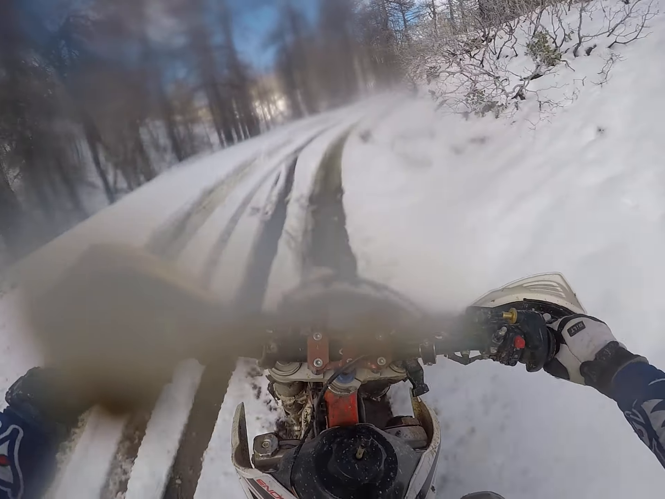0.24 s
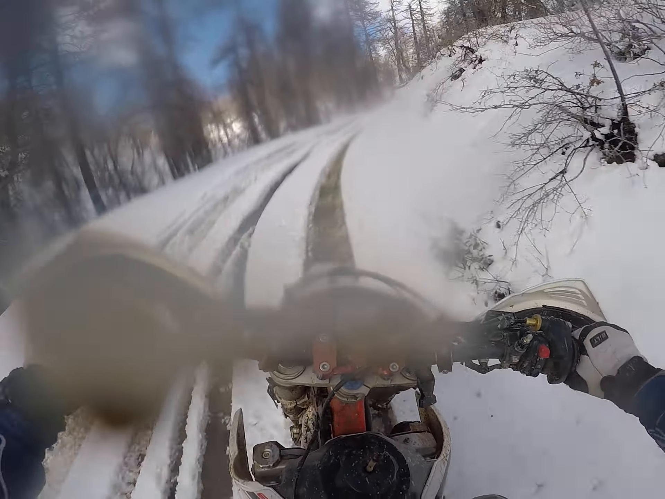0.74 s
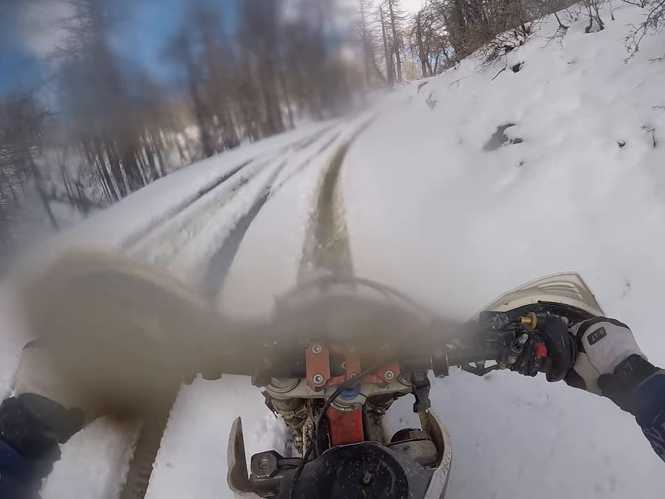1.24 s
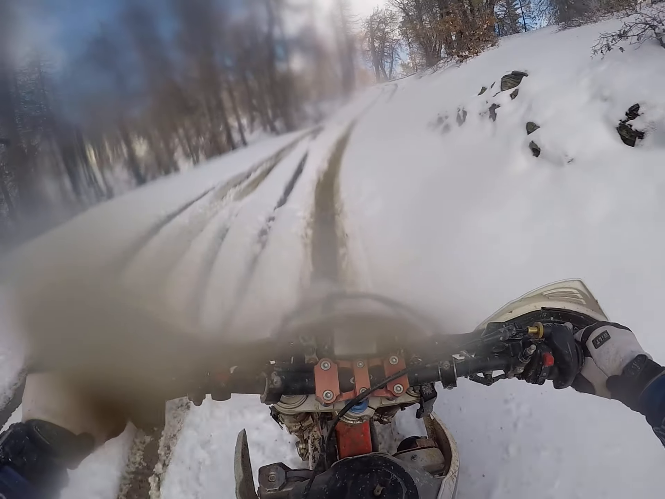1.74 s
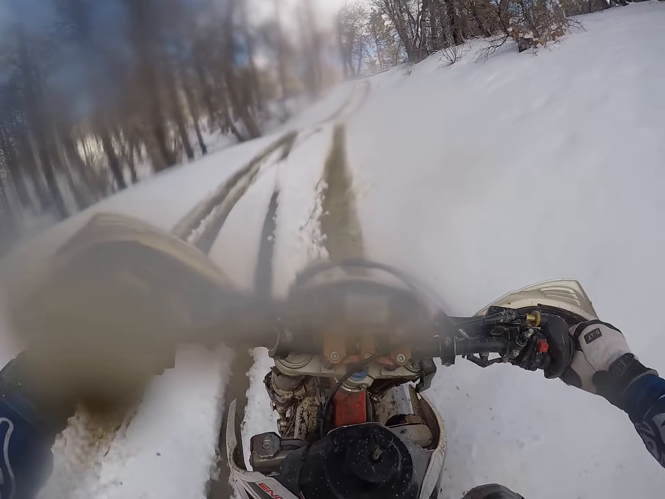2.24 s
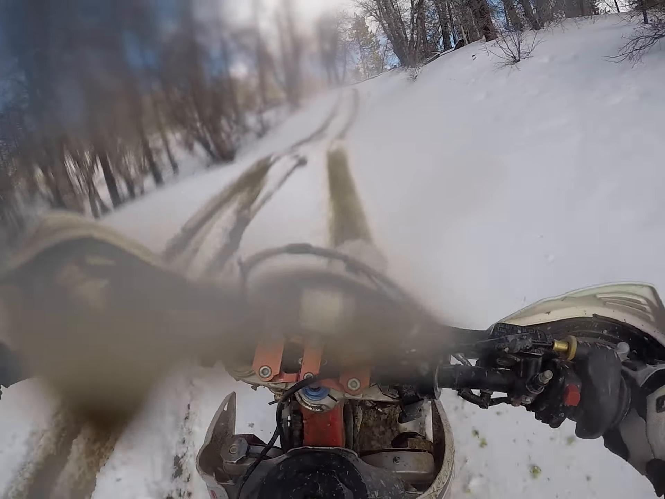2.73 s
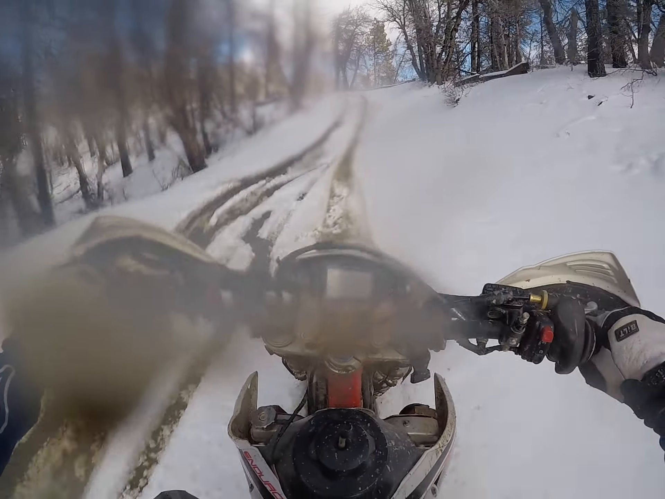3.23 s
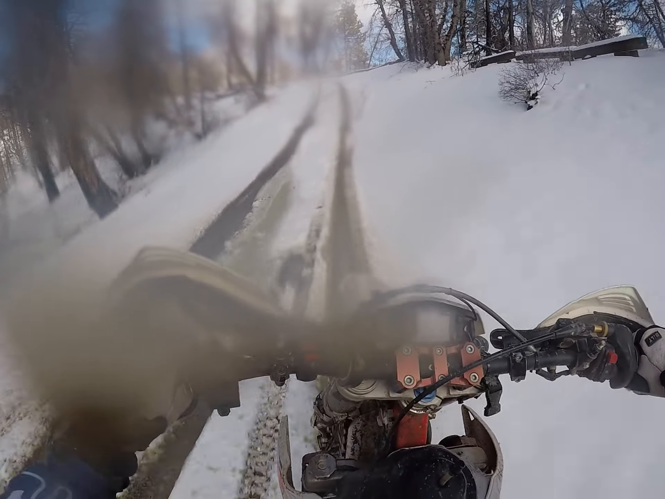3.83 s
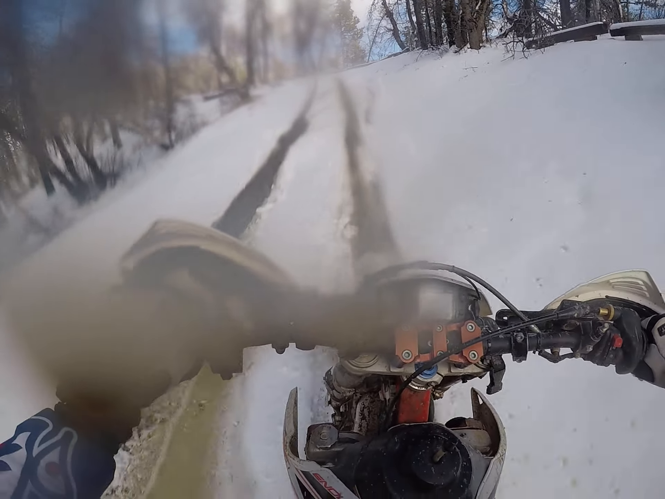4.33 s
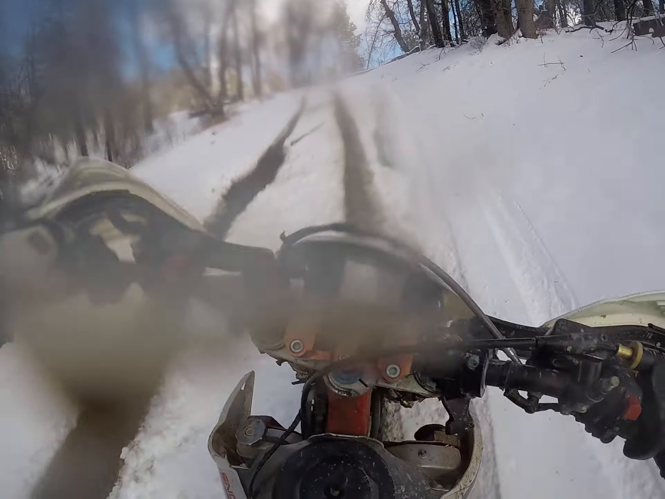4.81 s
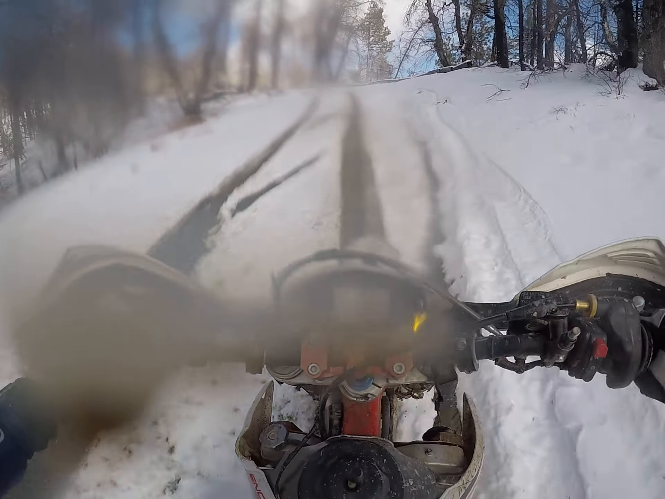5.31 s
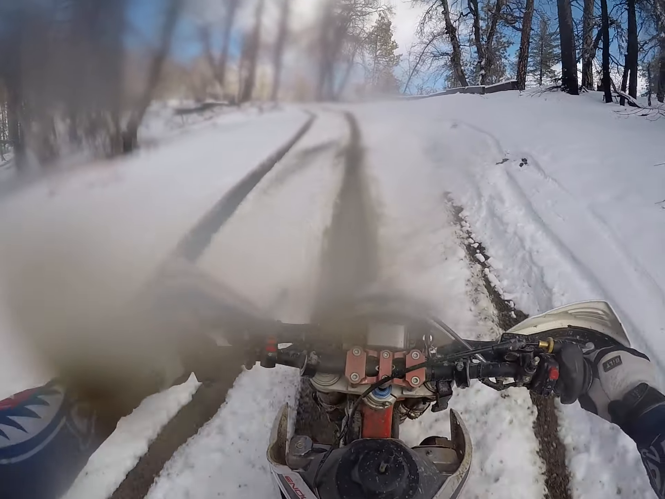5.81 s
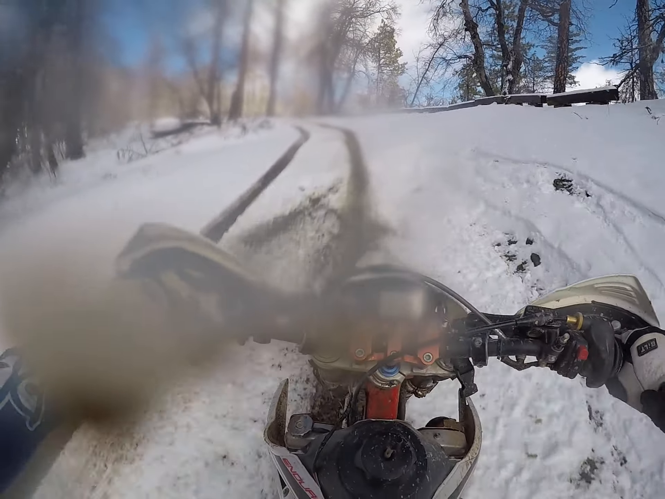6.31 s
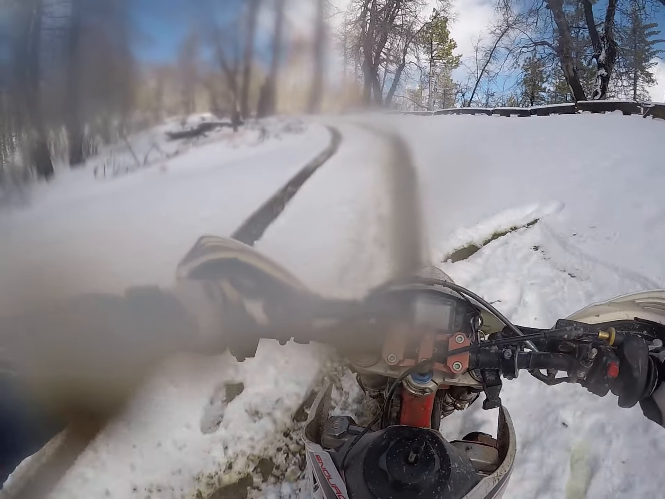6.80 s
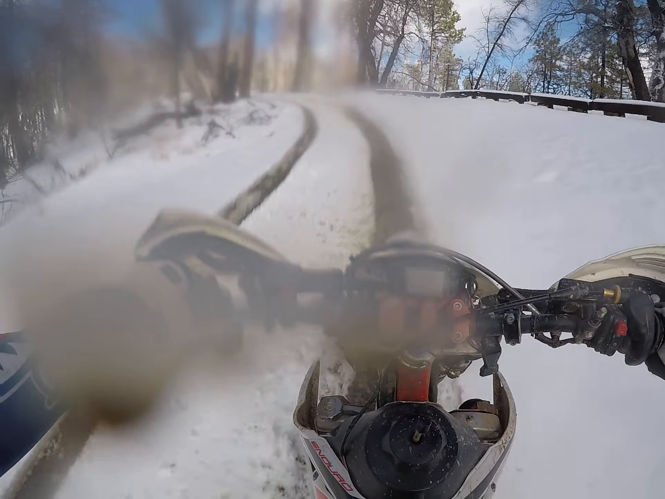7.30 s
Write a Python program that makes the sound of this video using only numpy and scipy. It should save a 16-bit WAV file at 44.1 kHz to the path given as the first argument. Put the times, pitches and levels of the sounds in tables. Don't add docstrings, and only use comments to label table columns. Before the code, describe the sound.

Heard from the rider's helmet on a snowy trail, a four-stroke dirt bike chugs with a low, pulsing exhaust and busy metallic clatter. The pitch wobbles with small wheel slips, then flares clearly before the third second and again before the fifth. Loose parts buzz around four seconds, a brake disc rings faintly, and wind rumbles softly at the microphone.

```python
import sys
import numpy as np
from scipy import signal
from scipy.io import wavfile

SR = 44100
rng = np.random.default_rng(int(sys.argv[2]) if len(sys.argv) > 2 else 0)


def level_to_linear(level):
    exponent = np.asarray(level, float) / 20
    return 10 ** exponent


def master_out(mix):
    frames = np.transpose(np.atleast_2d(mix))
    ceiling = np.clip(frames, -1, 1)
    pcm = np.round(ceiling * 32767).astype(np.int16)
    wavfile.write(sys.argv[1], SR, pcm)


N = 332955

# time [s], firing rate [firings per s].
CRUISE_SPEED = [(0.0, 35.87), (0.53, 35.48), (0.82, 33.59), (2.3, 33.77), (2.45, 34.39), (3.07, 34.74),
                (3.57, 33.86), (3.87, 33.95), (4.4, 35.74), (4.63, 36.11), (5.15, 36.57), (5.84, 35.83),
                (6.06, 37.35), (6.16, 38.29), (6.54, 38.98), (6.81, 39.04), (7.08, 35.57), (7.55, 36.73)]


def rms_one(x):
    return x / np.sqrt(np.mean(x ** 2) + 1e-20)


def at_hz(points, hz):
    table_hz, values = np.array(points)[:, 0], np.array(points)[:, 1]
    return np.interp(np.log(hz), np.log(table_hz), values)


def along(rows):
    s, *columns = np.transpose(rows)
    return [np.interp(np.arange(N) / SR, s, c) for c in columns]


def spells(rows, edge_s):
    t = np.arange(N) / SR
    total = 0
    for start, length, *values in rows:
        inside = np.minimum(t - start, start + length - t)
        total = total + np.outer(values, np.clip(inside / edge_s + 0.5, 0, 1))
    return total


def drift(rate):
    r = np.exp(-80 * np.pi * rate / SR)
    slow = signal.lfilter([1], [1, -2 * r, r * r], rng.standard_normal(N // 40 + 2002))
    slow = slow[2000:]
    return np.interp(np.arange(N) / 40, np.arange(len(slow)), rms_one(slow))


def resonate(x, hz, width_hz):
    r = np.exp(-np.pi * width_hz / SR)
    zeros = (1 - r * r) / 2 * np.array([1, 0, -1])
    poles = [1, -2 * r * np.cos(2 * np.pi * hz / SR), r * r]
    return signal.lfilter(zeros, poles, x)


def pan(db):
    return level_to_linear(np.array([[db / 2], [-db / 2]]))


def heard(x, side_db, lag_s):
    left, right = x * pan(side_db)
    return np.array([np.roll(left, round(lag_s * SR)), right])


def body(x, modes, patchy_db=0):
    out = 0
    for k, (hz, width_hz, db, side_db, lag_s) in enumerate(modes):
        gain = (-1) ** k * level_to_linear(db + patchy_db * drift(2.14))
        out = out + gain * heard(rms_one(resonate(x, hz, width_hz)), side_db, lag_s)
    return out / np.std(out.mean(axis=0))


def bank(spectrum, low_hz, count, alike, patchy_db):
    # frequency [Hz], left-right difference [dB].
    side_balance = [(60, 0.5), (110, 11), (200, 23), (370, 18), (680, -1), (1250, -7), (2280, -6),
                    (4190, 3), (7690, 0.5), (14100, -27.5)]
    out, edges = 0, low_hz * 2 ** (np.arange(count + 1) / 2)
    white = rng.standard_normal((2, 2, N))
    for k, (a, b) in enumerate(zip(edges, edges[1:])):
        band = signal.butter(2, [a, b], "band", fs=SR, output="sos")
        mid, side = signal.sosfilt(band, white[k % 2])
        hz = np.sqrt(a * b)
        likeness = np.clip(at_hz(alike, hz), -1, 1)
        gain = level_to_linear(at_hz(spectrum, hz) + patchy_db * drift(6.0)) * pan(at_hz(side_balance, hz))
        out = out + gain * (np.sqrt(1 + likeness) * mid + np.sqrt(1 - likeness) * side * [[1], [-1]])
    return out / np.std(out.mean(axis=0))


def gate(cycle, centre, sharp):
    return rms_one(np.exp(sharp * np.cos(2 * np.pi * (cycle - centre))))


def wind():
    # frequency [Hz], density [dB per Hz].
    rumble = [(15, -3), (30, 0), (80, -5), (150, -4), (250, -14), (700, -26), (1400, -34)]
    # start [s], length [s], rise [dB].
    gusts = [
        (.45, 0.39, 7.5),
        (1.2, 0.15, 7),
        (1.8, 0.15, 9),
        (3.45, 0.66, 3),
        (4.35, .15, 3.5),
        (5.8, 0.22, 3),
        (6.95, 0.22, 6.5),
    ]
    level_db = -28 + spells(gusts, edge_s=0.044)[0] + 1.8 * drift(8.7)
    return level_to_linear(level_db) * bank(rumble, 19.4, count=10, alike=[(20, 0.092), (1000, 0.35)], patchy_db=1.0)


def disc():
    # frequency [Hz], level [dB], time to decay by about 145 dB [s].
    disc_modes = [(8260, -2, .25), (10780, -9, .3), (12960, -19, .2), (13220, -19, .2), (14670, 6, .15)]
    # start [s], length [s], friction level [dB].
    rubs = [
        (0.32, 0.022, -55),
        (0.48, 0.047, -60),
        (1.56, 0.12, -59),
        (2.174, 0.043, -64),
        (2.833, 0.099, -59),
        (3.641, 0.14, -52.5),
        (3.847, 0.056, -62),
        (4.652, 0.077, -55),
    ]
    t = np.arange(N) / SR
    touch = level_to_linear(-71.5)
    for start, length, db in rubs:
        touch = touch + level_to_linear(db) * ((t > start) & (t < start + length))
    friction = touch * rng.standard_normal(N)
    ring = 0
    for hz, db, t60 in disc_modes:
        ring = ring + level_to_linear(db) * np.sqrt(SR * t60) / 2 * resonate(friction, hz, 5.3 / t60)
    return ring * pan(0.52)


def mechanical_hiss():
    # frequency [Hz], density [dB per Hz].
    hiss_colour = [(760, -30), (1300, 0), (1450, -5), (1760, -1.5), (2690, -4), (2910, -3.5), (3290, -3.5),
                   (3530, -9.5), (5130, -5.5), (6670, -3.5), (10500, -31.5), (14100, -37), (14500, -51)]
    # frequency [Hz], left-right likeness [-1 to 1].
    likeness = [(1300, 0.69), (2500, 0.56), (4500, 1), (6500, -0.38), (9000, -0.39), (14000, 1)]
    hiss = bank(hiss_colour, 1280, count=7, alike=likeness, patchy_db=1.58)
    return signal.sosfilt(signal.cheby2(8, 30, 13300, fs=SR, output="sos"), hiss)


def side_cover(ticks):
    # start [s], length [s], rise over rest [dB].
    cover_spells = [(0, .9, 4.5), (.9, 0.95, 7), (1.95, .25, 11), (2.3, 0.63, 7), (3.2, .78, 6.5),
                    (4.2, 0.14, 12), (4.32, 0.17, 14.5), (4.58, .12, 12), (4.82, .08, 14),
                    (6.6, 0.32, -2.5), (7.2, .35, 8)]
    rest_db = -47
    cover_db = rest_db + spells(cover_spells, edge_s=0.051)[0]
    ring = heard(rms_one(resonate(ticks, 2891, 52)), -2, 0)
    return level_to_linear(cover_db + 31.5 + 0.51 * drift(13)) * ring


def loose_guard(ticks, cycle):
    # frequency [Hz], width [Hz], level [dB], left-right [dB], left lag [s].
    guard_modes = [(2260, 57, -1.5, -2.1, 0), (3530, 76, -1, -5, 0.0026), (4110, 80, -5, -3, 0.003)]
    # start [s], length [s], rise over rest [dB].
    rattles = [
        (3.75, 0.28, 12.5),
        (4.2, 0.43, 11.5),
    ]
    rest_db = -19.5
    level = level_to_linear(rest_db + spells(rattles, edge_s=0.07)[0])
    return level * gate(cycle, 0.2, 0.51) * body(ticks, guard_modes, patchy_db=4.0)


def clatter(cycle):
    # frequency [Hz], width [Hz], level [dB], left-right [dB], left lag [s].
    case_modes = [(1730, 184, 5, -9, 0.00066), (2337, 114, 1.5, -0.5, 0), (2940, 73, -1, -6.5, 0.0045),
                  (3554, 80, -3, -13.5, 0), (3990, 160, -3, -4, 0), (4462, 100, 0, -3, 0),
                  (6630, 110, -18.5, 33, 0.027)]
    swell = gate(cycle, 0.2, 0.17) * level_to_linear(0.65 * drift(16))
    born = rng.random(N) < 1200 * swell / SR
    strength = level_to_linear(3.1 * np.minimum(rng.exponential(1, N), 4))
    ticks = born * rng.choice([-1, 1], N) * strength + 1e-18
    cases = level_to_linear(-2) * body(ticks, case_modes, patchy_db=2.7)
    return swell * mechanical_hiss() + cases + side_cover(ticks) + loose_guard(ticks, cycle)


def intake(pulses, cycle, rough):
    # frequency [Hz], width [Hz], level [dB], left-right [dB], left lag [s].
    box_modes = [(609, 177, -12.5, -10.5, .0003), (773, 83, -12, -9, .0002), (985, 156, -5, -9, .0001),
                 (1183, 218, -5.5, -10, .0001)]
    noise = rng.standard_normal(N) + 0.7 * rng.standard_normal((2, N))
    drive = rms_one(pulses) + rough * gate(cycle, 0.15, 0.22) * noise
    return body(drive, box_modes, patchy_db=0.95)


def snorkel(pulses, rough):
    # frequency [Hz], width [Hz], level [dB], left-right [dB], left lag [s].
    tube_mode = (487, 64, 0, -3.5, 0.47)
    drive = rms_one(pulses) + rough * rng.standard_normal(N)
    return body(resonate(drive, 417, 149), [tube_mode])


def crank(cycle):
    # multiple of the firing rate, level [dB], left-right [dB], left lag [rad].
    orders = [(1, -3, 5.5, .9), (2, .7, 6, .6), (3, -10, 5, .4), (4, -12, 4.5, .4), (5, -13, 4, .4)]
    sway = (1 + 0.33 * drift(1.6)) * np.array([[-0.5], [0.5]])
    out = 0
    for k, db, side_db, lag in orders:
        gain = np.sqrt(2) * level_to_linear(db + 1.3 * drift(4.1)) * pan(side_db)
        out = out + gain * np.sin(2 * np.pi * k * cycle + k * k + lag * sway)
    return out


def speed():
    # peak time [s], extra rate [firings per s], rise [s], fall [s].
    slips = [(0.23, 1.703, 0.11, 0.12), (0.42, 1.787, 0.16, 0.11), (0.71, 0.738, 0.18, 0.11),
             (0.95, 1.431, 0.12, 0.4), (1.34, 1.854, 0.17, 0.22), (1.88, 0.768, 0.08, 0.5),
             (2.71, 9.699, 0.24, 0.27), (2.86, 2.974, 0.13, 0.07), (3.17, 1.679, 0.1, 0.13),
             (3.47, 2.387, 0.3, 0.1), (4.27, 2.384, 0.17, 0.11), (4.52, 0.303, 0.1, 0.07),
             (4.76, 6.345, 0.12, 0.45), (4.765, 2.033, 0.08, 0.1), (5.28, 2.005, 0.12, 0.12),
             (5.51, 0.914, 0.1, 0.1), (5.96, 2.198, 0.12, 0.1), (6.62, 1.051, 0.08, 0.19),
             (7.39, 2.81, 0.26, 0.16)]
    t = np.arange(N) / SR
    rate = along(CRUISE_SPEED)[0]
    for peak, extra, rise, fall in slips:
        rate = rate + np.interp(t, [peak - rise, peak, peak + fall], [0, extra, 0])
    return rate


def firings(cycle, jitter_s):
    # delay [s], signed strength, scatter [dB].
    blows = [
        (0, .5, 1.2),
        (.0058, -.9, .5),
        (.0094, -.55, .8),
        (.0148, -.2, 2.0),
    ]
    at, out = np.flatnonzero(np.diff(np.floor(cycle))), np.zeros(N)
    chance = rng.standard_normal((len(at), 2 * len(blows)))
    for k, (delay, strength, scatter_db) in enumerate(blows):
        when = at + ((delay + jitter_s * chance[:, 2 * k]) * SR).astype(int)
        np.add.at(out, np.clip(when, 0, N - 1), strength * level_to_linear(scatter_db * chance[:, 2 * k + 1]))
    return out


def exhaust(pulses, cycle, load, rough):
    # frequency [Hz], width [Hz], level [dB], left-right [dB], left lag [s].
    silencer = [(194.6, 69, -4.5, 5, 0.0002), (278.8, 112, 0.5, 4, 0.00035),
                (355.6, 82, -5.5, 6.5, 0.00041)]
    long_ring = [(245.3, 28, -1, 2.8, 0.00049), (307, 57, -9, 3.7, 0.00027)]
    hollow = [(190, 35, 0, 2.8, 0.00017), (331, 67, 4.5, 1.5, 0.00033), (420, 23, -4, 2, 0.00019)]
    drive = rms_one(pulses) + rough * gate(cycle, 0.15, 0.16) * rng.standard_normal(N)
    drive = -resonate(drive, 184, 490)
    pull, overrun = np.clip(load, 0, 1), np.clip(-load, 0, 1)
    plain = np.sqrt(1 - pull - overrun) * body(drive, silencer, patchy_db=1.65)
    pulling = np.sqrt(pull) * body(resonate(drive, 251.0, 78), long_ring)
    return plain + pulling + np.sqrt(overrun) * body(drive, hollow)


def scene():
    # time [s], exhaust level [dB].
    effort = [(0, -15), (.3, -15), (.58, -16.5), (.86, -15), (1.05, -16.5), (1.25, -14), (1.75, -17.5),
              (2.08, -15), (2.5, -13.5), (3.0, -15.5), (3.6, -16), (3.91, -18.5), (4.2, -14), (4.5, -16),
              (5.05, -16), (5.45, -14.5), (6.8, -14.5), (7.55, -14)]
    # start [s], length [s], load change [negative shuts, positive opens; the sum is
    # kept within -1 to 1], exhaust rise [dB].
    twists = [(.5, 0.055, 0.25, -6.5), (2.2, 0.054, -0.91, -1.5), (2.605, 0.07, 1, 3),
              (2.7, 0.12, -1.3, 1.5), (2.85, 0.089, -0.28, -5), (3.08, 0.23, 0.53, 2),
              (3.32, 0.036, -0.45, -7), (4.58, 0.058, 0.043, 3.5), (4.652, .1, 1.1, 7.5),
              (4.755, .09, -.9, -2.5), (4.845, 0.14, -0.67, -1.3), (5.65, 0.2, 0.055, -2),
              (6.05, 0.16, 0.46, 1.5), (6.88, .17, -0.34, -1), (7.13, 0.18, 0.11, 2)]
    # start [s], length [s], tube rise [dB].
    leans = [
        (.55, .35, 0.5),
        (1.8, 0.97, -2),
        (2.67, 0.42, 4.5),
        (3.2, 0.63, 4),
        (4.38, 0.21, 5),
        (4.62, .5, -4.5),
    ]
    rate = speed()
    effort_db = along(effort)[0]
    twist, twist_db = spells(twists, edge_s=0.017)
    silencer_db = effort_db + twist_db
    over_mean_db = -15.5
    load = np.clip(0.051 + 0.3 * (effort_db - over_mean_db) + twist, -1, 1)
    faster = along(CRUISE_SPEED)[0] - 36

    duck_db = -np.maximum(silencer_db + 13.5, 0)
    keep = np.exp(-1 / (0.031 * SR))
    duck_db = signal.lfilter([1 - keep], [1, -keep], duck_db)

    thump_db = -22 + 0.7 * np.minimum(silencer_db - over_mean_db, 0) + 0.5 * drift(9.8)
    snorkel_db = -28 - 2 * load + spells(leans, edge_s=0.13)[0] + 0.5 * drift(5.4)
    intake_db = -29 - 0.42 * faster + duck_db + 1.13 * drift(8.3)
    clatter_db = -33.5 - 0.04 * faster + duck_db + 0.08 * drift(21)

    cycle = 0.787 + np.cumsum(rate) / SR
    pulses = firings(cycle, jitter_s=0.0001)
    low = level_to_linear(thump_db) * crank(cycle)
    low = low + level_to_linear(silencer_db + 0.6) * exhaust(pulses, cycle, load, rough=0.09)
    air = level_to_linear(snorkel_db - 0.7) * snorkel(pulses, rough=0.1)
    air = air + level_to_linear(intake_db) * intake(pulses, cycle, rough=0.8)
    high = level_to_linear(clatter_db - 1.97) * clatter(cycle) + disc()
    return low + air + high + wind()


def band_limit(x):
    return signal.sosfilt(signal.butter(12, 14700, fs=SR, output="sos"), x)


def record(dry):
    dull = signal.sosfilt(signal.butter(6, 13200, fs=SR, output="sos"), -dry)
    return band_limit(np.tanh(dull / 0.92))


dry = scene()
out = record(dry)
master_out(out)
```